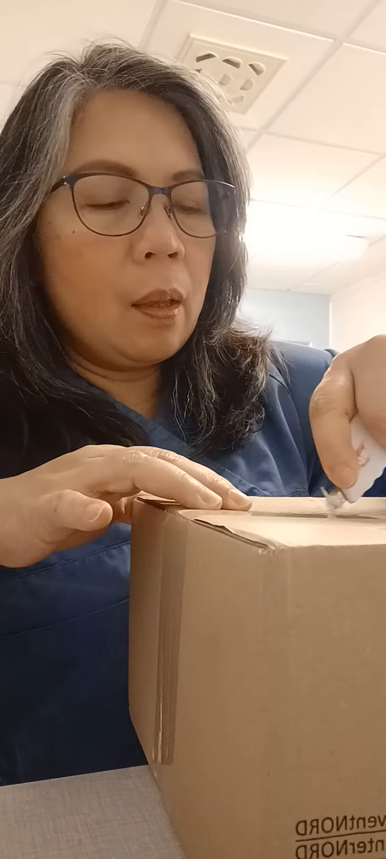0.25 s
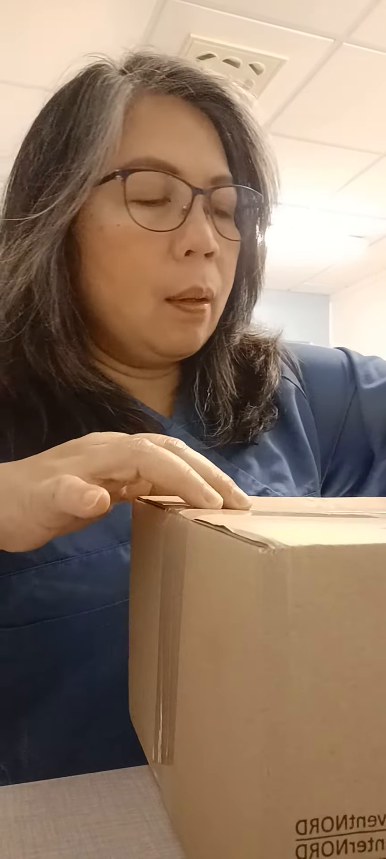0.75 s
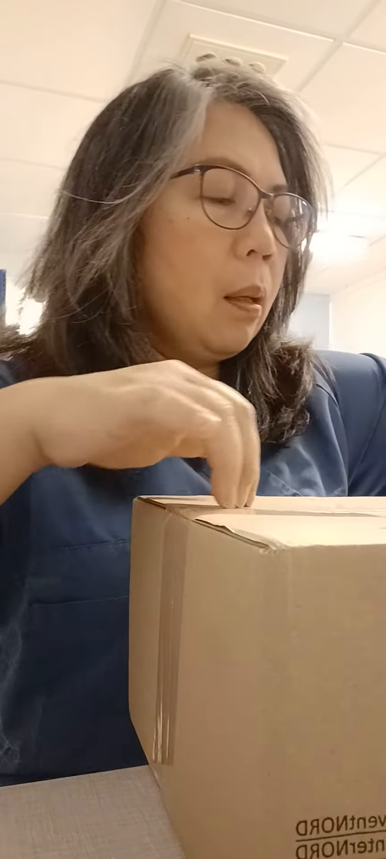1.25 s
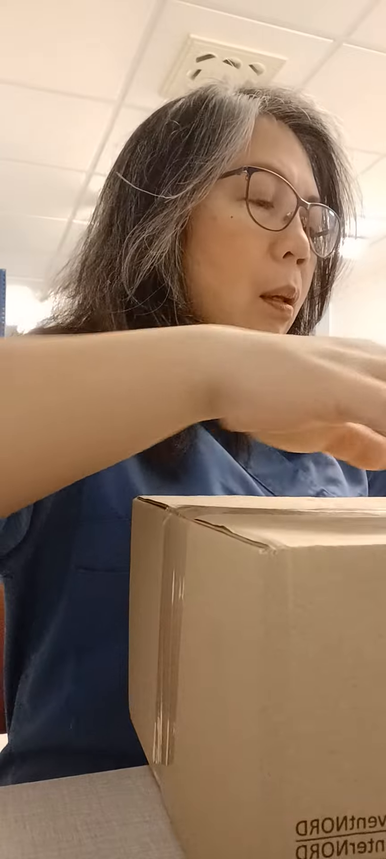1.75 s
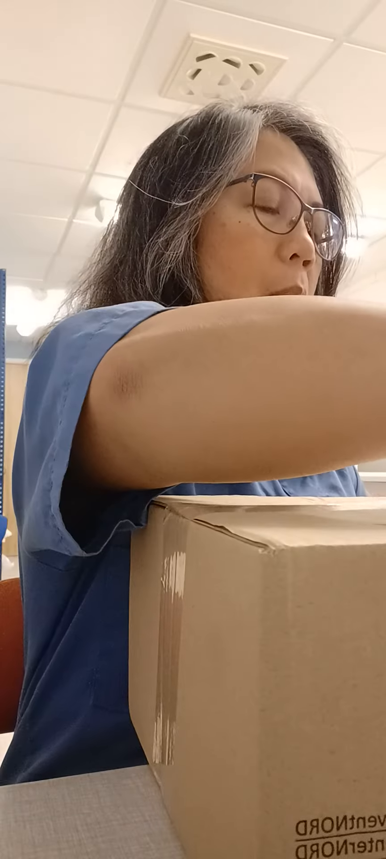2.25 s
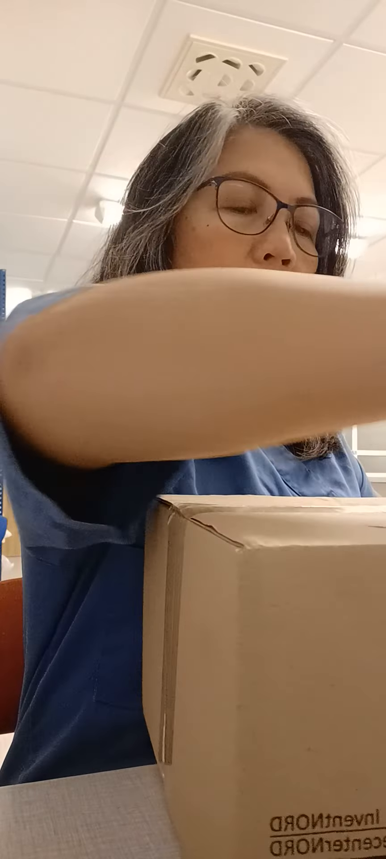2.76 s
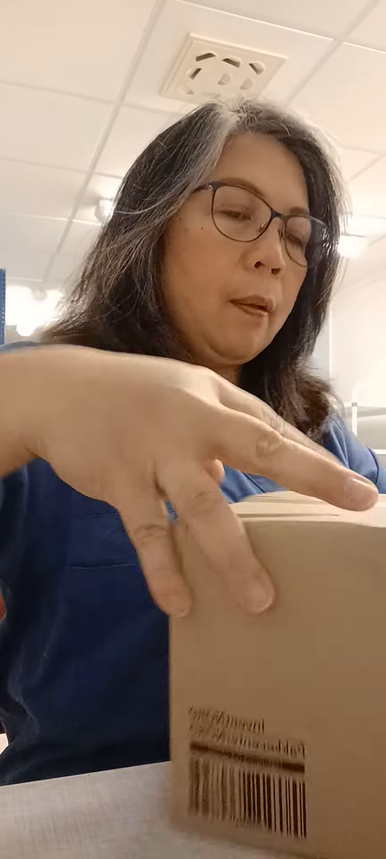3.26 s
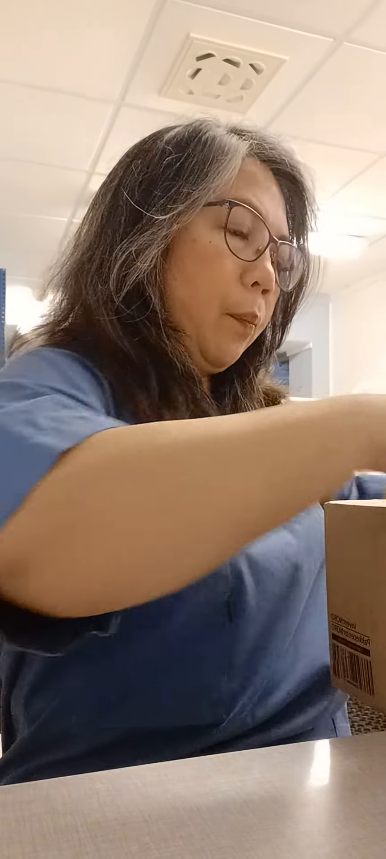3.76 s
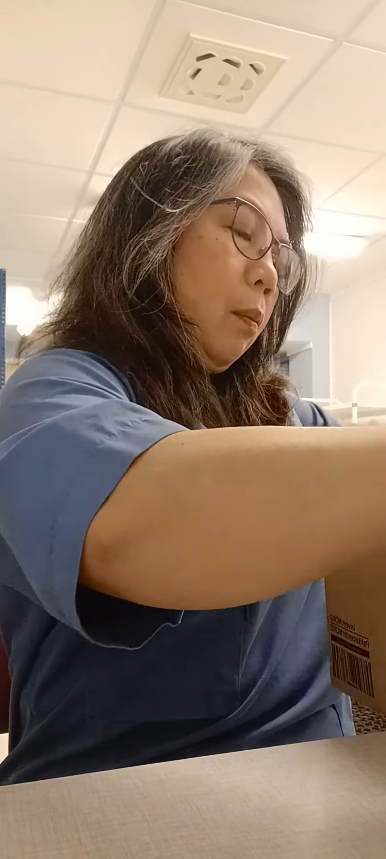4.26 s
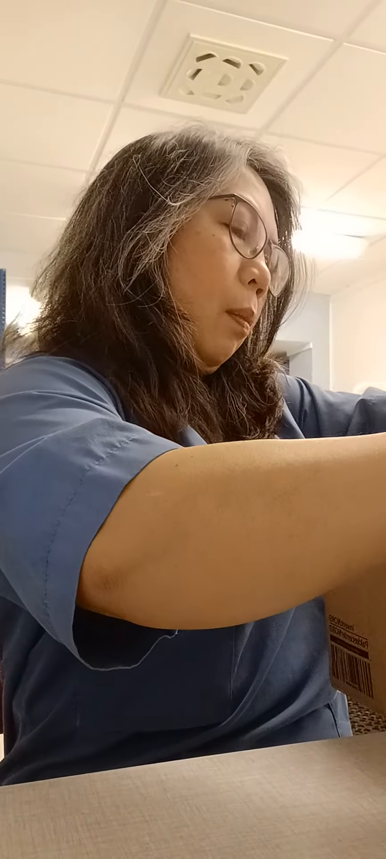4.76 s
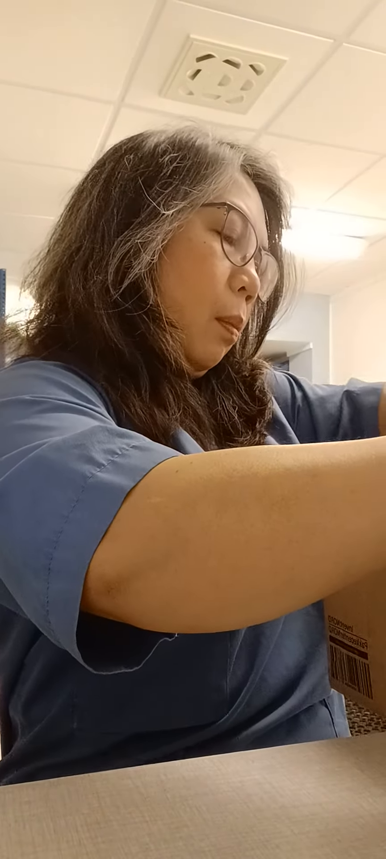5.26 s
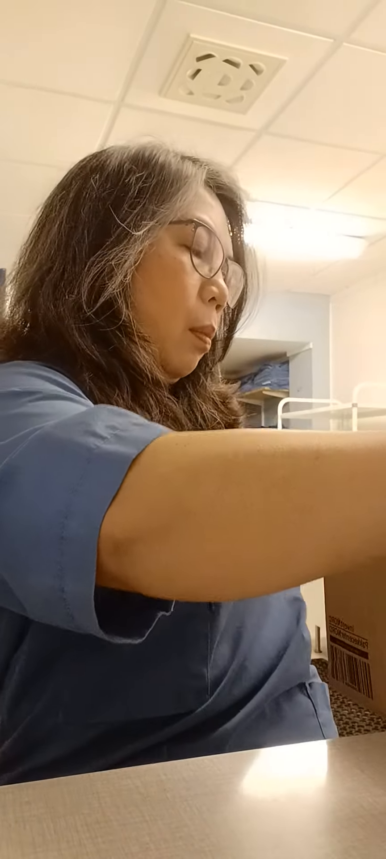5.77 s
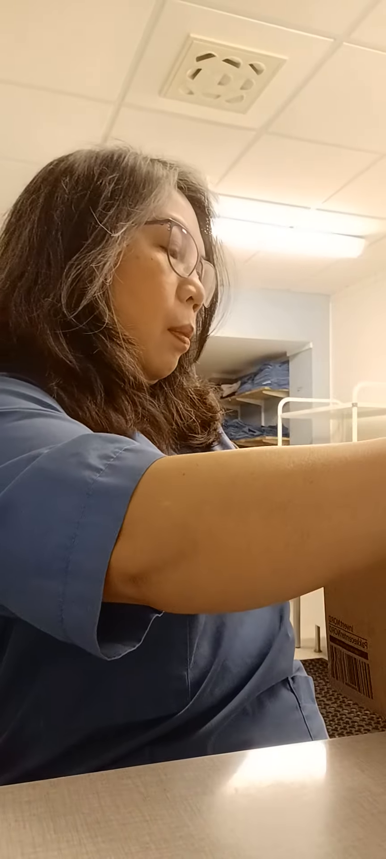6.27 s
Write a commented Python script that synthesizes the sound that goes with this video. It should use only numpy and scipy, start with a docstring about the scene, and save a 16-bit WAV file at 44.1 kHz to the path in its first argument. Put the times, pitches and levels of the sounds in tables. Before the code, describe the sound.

A blade rasps in ragged jabs through packing tape on a cardboard box, with hollow knocks, sharp snaps, a slide and fine metallic jingles.

```python
"""Ventilation hums while a hand brushes a cardboard box, jingling its small metal jewellery. A box cutter
then rasps through packing tape; there are knocks and tape snaps, a slide across the table and a second seam.
Rubbing is made of many tiny random impulses, knocks of ringing tones and noise, snaps of short noise puffs,
jingles of ringing metal tones, and ventilation of low noise with a few hum tones. The room is small and dry."""
import sys
import numpy as np
from scipy import signal
from scipy.fft import rfft, irfft, next_fast_len
from scipy.io import wavfile
from scipy.ndimage import uniform_filter1d, map_coordinates

SR = 44100
rng = np.random.default_rng(int(sys.argv[2]) if len(sys.argv) > 2 else 0)


def to_wav(s):
    """Save 16-bit WAV."""
    ch = np.atleast_2d(s).T  # columns
    pcm = np.round(np.clip(ch, -1, 1) * 32767)  # PCM
    wavfile.write(sys.argv[1], SR, pcm.astype(np.int16))


N = 287532

TIME = np.arange(N) / SR  # seconds from the start of the scene
AGE = np.arange(SR // 3) / SR  # seconds since a short sound began
SIDES = np.array([[1], [-1]])  # left channel, right channel


def amp(db):
    """Turn decibels into a gain."""
    return 10 ** (np.asarray(db) / 20)


def unit(x):
    """Scale a sound to an average (rms) strength of 1."""
    return x / np.sqrt(np.mean(x ** 2) + 1e-20)


def burst(x):
    """Scale a short sound to rms 1 over its first 15 ms."""
    return x / np.sqrt(np.mean(x[..., :662] ** 2) + 1e-20)


def along(points, hz):
    """Read a curve of (Hz, value) points, joined by lines on a log frequency axis."""
    f, v = np.transpose(points)
    return np.interp(np.log(hz + 1), np.log(f + 1), v)


def wobble(rate, count=N):
    """A smooth random curve with rate random values a second."""
    values = rng.standard_normal(2048)
    return map_coordinates(values, [TIME[:count] * rate], mode="wrap")


def filtered(x, response):
    """Multiply the spectrum of x by a response that depends on frequency."""
    n = x.shape[-1]
    padded = next_fast_len(n + 8192)
    spectrum = rfft(x, padded) * response(np.fft.rfftfreq(padded, 1 / SR))
    return irfft(spectrum, padded)[..., :n]


def coloured(x, gain_db, size=4096):
    """Give both channels a tone colour in dB, with a filter that never sounds ahead of its input."""
    cepstrum = irfft(np.log(amp(gain_db(np.fft.rfftfreq(size, 1 / SR))) + 1e-6))
    # folding the cepstrum onto its first half makes the filter causal
    cepstrum[1:size // 2] *= 2
    cepstrum[size // 2 + 1:] = 0
    impulse = irfft(np.exp(rfft(cepstrum)))
    return signal.fftconvolve(x, impulse[None], axes=1)[:, :x.shape[1]]


def add(track, s, sound):
    """Mix a sound into the track at time s, in seconds."""
    part = track[..., max(round(s * SR), 0):][..., :sound.shape[-1]]
    part += sound[..., :part.shape[-1]]


def ring(hz, t60):
    """One ringing tone that falls by 60 dB in t60 seconds."""
    return np.sin(2 * np.pi * hz * AGE) * amp(-60 * AGE / t60)


def puff(t60, rise, colour):
    """A dying burst of coloured noise, different in each channel; t60 and rise are in seconds."""
    envelope = (1 - np.exp(-AGE / rise)) * amp(-60 * AGE / t60)
    noise = rng.standard_normal((2, len(AGE))) * envelope
    return burst(coloured(noise, lambda f: along(colour, f)))


def slips(rate, spread_db, count=N):
    """Stick-slip: about rate tiny impulses a second, uneven in size, each with its own stereo direction."""
    size = amp(spread_db * np.minimum(rng.exponential(size=count), 4))
    way = rng.uniform(0, 2 * np.pi, count)
    happens = rng.random(count) < rate / SR
    return unit(happens * size * np.array([np.cos(way), np.sin(way)]))


def patchy(x, depth_db):
    """The colour shifts as the point of contact moves over the card."""
    z = signal.stft(x, nperseg=256)[2]
    over_pitch = uniform_filter1d(rng.standard_normal(z.shape[1:]), size=3, axis=0)
    field = uniform_filter1d(over_pitch, size=18, axis=1)  # smooth over time too
    return signal.istft(z * amp(depth_db * unit(field)), nperseg=256)[1][:, :x.shape[1]]


def effort(start, end, db, swell_db, attack_s, release_s, arch_db=0):
    """Gain of one hand movement: an attack, a hold that swells or arches, and a fall of 60 dB in release_s."""
    uneven_db, uneven_per_s = 1.2, 16  # the pressure is never quite steady
    from_middle = np.clip((TIME - start) / (end - start), 0, 1) - .5
    arch = -arch_db * (2 * from_middle) ** 2  # loudest halfway
    hold_db = swell_db * from_middle + arch + uneven_db * wobble(uneven_per_s)
    attack = np.clip((TIME - start) / attack_s, 0, 1)
    return attack * amp(db + hold_db - 60 * np.maximum(TIME - end, 0) / release_s)


def ventilation():
    """A low rush of air, alike in both channels in the bass, over a mains hum."""
    # Colour of the rushing air. Each row: frequency in Hz, relative level in dB.
    air_colour = [(18, -55), (30, -39), (70, -8), (86, -11), (106, -5), (124, -10), (199, -6), (336, -20),
                  (404, -19.5), (584, -34), (780, -28.5), (1160, -42.5), (1630, -53), (1960, -48.5),
                  (16000, -58.5)]
    # Tones of the mains hum. Each row: frequency in Hz, level in dB around which it drifts.
    hum_tones = [(49, -62.5), (100, -50), (200, -64.5)]
    air = filtered(rng.standard_normal((2, N)), lambda f: amp(along(air_colour, f)))
    side = filtered(air[1], lambda f: amp(along([(100, -17), (700, -9), (2500, -1)], f)))
    rush = amp(-50.0) * unit(air[0] + SIDES * side)
    hum = sum(amp(db + wobble(3.2)) * np.sqrt(2) * np.sin(2 * np.pi * hz * TIME + 0.22 * wobble(4.4))
              for hz, db in hum_tones)
    left_lift_db = [(80, .1), (700, 0.33), (8000, 0.4)]  # the right is lowered by as much
    return filtered(rush + hum, lambda f: amp(SIDES * along(left_lift_db, f)))


def handling():
    """Skin and cloth brush the card as dense tiny slips, with a few quicker scuffs."""
    # Hands and sleeves brush the box. Each row: start in seconds, end in seconds, relative level in dB,
    # swell over the brush in dB, gain of the sheen above 8 kHz in dB.
    brush_moves = [(0.0, 0.067, -63, -8, -6), (0.21, 0.28, -67.5, 4, 11), (1.59, 1.983, -67, -7, 7),
                   (2.001, 2.483, -52, -2, -0.5), (2.613, 2.766, -45.5, -4.5, -1.5),
                   (2.941, 3.04, -49, -4, 12), (3.839, 4.26, -55, 8.5, 0.5), (4.327, 4.486, -60, -2, -6),
                   (5.48, 5.883, -58, 2, -1), (5.965, 6.032, -63, -15, -2)]
    # Brief scuffs on the card, by fingers or a catching edge. Each row: start in seconds, relative level in dB.
    brief_scuffs = [(0.804, -30.5), (0.8654, -30.5), (2.0236, -42), (2.657, -25.5), (3.576, -34),
                    (4.1144, -41.5), (4.1695, -38.5), (4.591, -40), (4.639, -42), (6.373, -44.5),
                    (6.414, -48)]
    # Colour of the brushing. Each row: frequency in Hz, relative level in dB.
    rustle_colour = [(70, -45), (300, 0.5), (800, 7), (1400, -9.5), (2500, -3), (6200, -6), (8000, -19),
                     (11000, -7), (15000, -3.5)]
    # Colour of the scuffs. Each row: frequency in Hz, relative level in dB.
    scuff_colour = [(100, -43), (500, 5), (900, -11), (2200, 3.5), (4500, -2), (6500, -6.5), (8000, -28),
                    (15000, -21)]
    clumps = amp(1.8 * wobble(60))
    rustle = unit(coloured(slips(rate=2800, spread_db=2.5) * clumps, lambda f: along(rustle_colour, f)))
    sheen = filtered(rustle, lambda f: f > 8000)
    brushes = np.zeros((2, N))
    for start, end, db, swell_db, sheen_db in brush_moves:
        gain = effort(start, end, db, swell_db, attack_s=0.026, release_s=0.34)
        brushes += gain * (rustle + (amp(sheen_db) - 1) * sheen)
    scuff = coloured(slips(rate=6400, spread_db=8.0), lambda f: along(scuff_colour, f))
    pressure = np.zeros(N)
    swell = AGE / 0.0074  # each scuff presses hardest after 7.4 ms
    for s, db in brief_scuffs:
        add(pressure, s, amp(db - 11.5) * swell * np.exp(1 - swell))
    return patchy(brushes + unit(scuff) * pressure, depth_db=4.0)


def jingles():
    """Tiny links strike one another: a flurry of noise sets their high tones ringing, then again more softly."""
    # The moving hand shakes its jewellery. Each row: start in seconds, relative level in dB.
    shakes = [(0.0537, -44.5), (1.6606, -34.5), (1.852, -51), (1.9676, -41), (2.0532, -28.5), (2.3555, -35),
              (3.8652, -36.5), (3.996, -42), (4.0402, -39.5), (4.2228, -29.5), (4.5053, -35.5),
              (5.0754, -36), (5.1573, -33), (5.2434, -37), (5.6426, -43.5), (5.7718, -34.5),
              (6.0018, -47.5)]
    # Ring of the metal links. Each row: central frequency in Hz, central relative level in dB,
    # time to fall by 60 dB in seconds.
    link_tones = [(7200, -1, 0.045), (10000, 0, 0.15), (10140, -4.5, 0.092), (12300, -8, .06),
                  (13100, 4, .07), (13700, 17, 0.058), (15600, -6, 0.033), (15700, -12, .08)]
    fizz_colour = [(1000, -40.0), (2500, -11.5), (6500, -9.5), (8500, -32.0), (10500, -4.5), (14000, 2.5)]
    swing_back_s, swing_back_db = 0.079, -16.5  # about when, and how softly, the links touch once more
    out = np.zeros((2, N))
    swings = [(s + swing_back_s * rng.uniform(.8, 1.2), db + swing_back_db) for s, db in shakes]
    for s, db in list(shakes) + swings:
        contacts = puff(t60=.07, rise=.001, colour=[(1000, 0)])
        metal = np.zeros(len(AGE))
        for f, level, t60 in link_tones:
            # no two strikes ring quite alike
            metal += amp(level + rng.normal(0, 2.5)) * ring(f * (1 + rng.normal(0, .012)), t60)
        tone = burst(signal.fftconvolve(contacts, metal[None], axes=1)[:, :len(AGE)])
        fizz = puff(t60=0.24, rise=0.0011, colour=fizz_colour)
        add(out, s, amp(db - 11.5) * (tone + amp(2) * fizz))
    return out


def rub(strokes, colour, rate, spread_db, flutter_db, rumble_db, tick_db, attack_s, release_s,
        arch_db=0, count=SR):
    """Slips shake the whole box (rumble), its panels (rasp) and its surface (hiss), under one effort."""
    # Broad resonances of the box. Each row: frequency in Hz, width in Hz, lift in dB.
    box_resonances = [(254, 39, 6), (395.3, 28, 7), (805, 37, 1), (1217, 220, 4), (2000, 210, 3)]

    def shape(f):
        """Colour of the rubbing plus the resonances of the box, in dB."""
        lifts = sum(db / (1 + (2 * (f - hz) / w) ** 2) for hz, w, db in box_resonances)
        return along(colour, f) + lifts

    def below(f, hz):
        """A smooth gain that keeps what lies below hz."""
        return 1 / (1 + (f / hz) ** 8)

    out = np.zeros((2, N))
    for start, end, db, swell_db, hiss_db in strokes:
        force = slips(rate, spread_db, count=count)
        body = coloured(force, shape)
        clumps = force * amp(flutter_db * wobble(221, count=count))  # the finest slips come in clumps
        # sparser tiny ticks crackle among the slips
        ticks = amp(tick_db) * slips(rate=150, spread_db=0, count=count)
        crackle = coloured(clumps + ticks, shape)
        rumble = filtered(body[:1], lambda f: below(f, 392))  # long waves reach both channels alike
        rasp = filtered(body[0] + 0.25 * SIDES * body[1], lambda f: below(f, 2120) - below(f, 346))
        hiss = patchy(filtered(crackle, lambda f: 1 - below(f, 1570)), depth_db=2.5)
        mix = amp(rumble_db) * unit(rumble) + unit(rasp) + amp(hiss_db) * unit(hiss)
        gain = effort(start, end, db, swell_db, attack_s, release_s, arch_db)
        add(out, start, gain[round(start * SR):][:count] * mix)
    return out


def seams():
    """The blade catches and slips through tape and card: ragged jabs, one smooth stroke, then the next seam."""
    # Ragged jabs along the first seam. Each row: start in seconds, end in seconds, relative level in dB,
    # swell over the stroke in dB, tape hiss over the rasp in dB.
    first_jabs = [(0.255, 0.385, -48.5, 3.5, -1), (0.42, 0.59, -44, 4, -5.5),
                  (0.645, 0.725, -41.5, -3.5, -5.5), (0.755, 0.965, -41, -1.5, -5)]
    # The long, smooth stroke that opens it, and a deeper bite during it. Each row: start in seconds,
    # end in seconds, relative level in dB, swell over the stroke in dB, tape hiss over the rasp in dB.
    long_cut = [(1.06, 1.545, -40.5, 5, -3.5), (1.21, 1.31, -38.5, 0, -12)]
    # Pulls along the second seam. Each row: start in seconds, end in seconds, relative level in dB,
    # swell over the stroke in dB, tape hiss over the rasp in dB.
    second_pulls = [(4.492, 4.755, -45, -1.5, -12.5), (4.83, 4.93, -53, 15, -16), (4.96, 5.11, -54, 4, -7),
                    (5.135, 5.485, -49, 4, -2)]
    # Colour of the jabs. Each row: frequency in Hz, relative level in dB.
    jab_colour = [(53, -38), (90, -4), (260, -4), (323, -5.5), (393, -2), (581, 1), (769, 4.5), (1240, -2),
                  (1440, -13.5), (4860, -15), (7660, -24), (12600, -20.5), (16000, -23.5)]
    # Colour of the long stroke. Each row: frequency in Hz, relative level in dB.
    cut_colour = [(53, -16), (90, 5), (180, 8), (284, -5), (393, -4), (438, -6.5), (606, 0.5), (753, -9.5),
                  (1210, -7.5), (1410, -21), (4000, -24.5), (4750, -20.5), (8350, -40.5), (12300, -31),
                  (16000, -36.5)]
    # Colour of the second seam. Each row: frequency in Hz, relative level in dB.
    pull_colour = [(53, -34), (90, 5), (176, -2), (229, -1), (316, -10.5), (393, -5.5), (568, -9.5),
                   (821, 0), (1380, -25.5), (1570, -21.5), (3360, -22.5), (3910, -20), (7660, -37.5),
                   (14000, -26), (16000, -38)]
    jabs = rub(first_jabs, jab_colour, rate=2500, spread_db=1.5, flutter_db=2.5, rumble_db=0.5,
               tick_db=-17, attack_s=0.035, release_s=0.38)
    stroke = rub(long_cut, cut_colour, rate=4500, spread_db=0.5, flutter_db=-2.5, rumble_db=1.0,
                 tick_db=-12, attack_s=0.028, release_s=0.1, arch_db=0.5)
    second = rub(second_pulls, pull_colour, rate=4500, spread_db=2.0, flutter_db=2.0, rumble_db=2.5,
                 tick_db=-8, attack_s=0.006, release_s=0.21)
    return jabs + stroke + second


def blow(hz, thump_db, clack_db, crack_db, lag_s):
    """A blow cracks the surface, rings a panel and, lag_s later, sets the wall of the box swinging."""
    # Ring of a cardboard panel. Each row: central frequency in Hz, central relative level in dB,
    # time to fall by 60 dB in seconds.
    panel_tones = [(364, -12, 0.09), (515, -10.5, 0.076), (613, -23, 0.022), (769, 7, 0.026),
                   (880, -4, 0.023), (1108, -10, 0.032), (1620, -12, 0.012), (2275, -26.5, 0.047)]
    # Colour of the surface crack. Each row: frequency in Hz, relative level in dB.
    crack_colour = [(100, -46), (500, 12.5), (1100, 15), (1700, 7.5), (2400, 7.5), (3500, -0.5), (6300, -4),
                    (8000, -16), (15000, -14)]
    t60 = 10.6 / hz  # the wall falls by 60 dB in 10.6 swings
    wall = ring(hz, t60) + amp(-11.5) * ring(hz * 1.35, t60)
    thump = wall * (1 - np.exp(-AGE / 0.0026))
    strength, detune = rng.normal(0, [[1.5], [.015]], (2, len(panel_tones)))  # no two blows ring alike
    panel = np.zeros(len(AGE))
    for k, (f, level, life) in enumerate(panel_tones):
        panel += (-1) ** k * amp(level + strength[k]) * ring(f * (1 + detune[k]), life)
    crush = 1 - np.exp(-(AGE / .0013) ** 2)  # the contact softens the onset
    crack = puff(t60=0.051, rise=0.0022, colour=crack_colour)
    out = amp(clack_db) * burst(crush * panel) + amp(crack_db) * crack
    add(out, lag_s, amp(thump_db) * burst(thump))
    return out


def knocks():
    """Soft blows only thump, hard ones clack and crack; the corners of the box land with a hollow clack."""
    # Blows on the box, from a soft palm (0) to the blade breaking through (1). Each row: start in seconds,
    # relative level in dB, hardness from 0 to 1, pitch of the struck wall in Hz.
    box_blows = [(0.302, -29, 0.5, 140), (0.538, -23.5, 0.74, 158), (0.573, -27.5, 0.54, 143),
                 (0.654, -26, 0.93, 354), (0.78, -37, 1, 404), (0.91, -34.5, 1, 285),
                 (0.966, -28.5, 0.23, 203), (1.04, -27, 0.62, 187), (1.093, -27.5, 0.44, 130),
                 (1.522, -31, 0.86, 122), (2.221, -35, 0.76, 196), (2.263, -22, 0.16, 214),
                 (2.649, -30, 0.53, 153), (2.663, -22, .7, 126), (2.671, -31, 0.51, 377),
                 (3.871, -37.5, 0, 124), (4.494, -30, 0.5, 147), (4.765, -43.5, 0.9, 630),
                 (5.156, -37.5, 0.93, 217), (5.432, -34, 0.82, 157), (5.465, -25.5, 0.8, 150),
                 (5.676, -35, 0.37, 130)]
    # The box is set down, corner after corner. Each row: start in seconds, relative level in dB.
    corner_landings = [(4.211, -30.5), (4.228, -21.5), (4.253, -27), (4.28, -41)]
    soft_db = 38  # the softest blow clacks and cracks this much less than the hardest
    hard_thump_db, wall_lag_s = -1.5, 0.00833  # thump level and delay of the hardest blow
    out = np.zeros((2, N))
    for s, db, hardness, hz in box_blows:
        clack_db = -soft_db * (1 - hardness)
        thump_db = hard_thump_db * hardness ** 2
        hit = blow(hz, thump_db, clack_db, crack_db=clack_db, lag_s=wall_lag_s * hardness ** 2)
        add(out, s, amp(db - 2.0) * hit)
    for s, db in corner_landings:
        add(out, s, amp(db) * blow(hz=233, thump_db=-4.5, clack_db=-2.5, crack_db=-21, lag_s=0.002))
    return out


def snaps():
    """Taut tape gives way with a short, bright tick of noise."""
    # Sharp snaps of the tape. Each row: start in seconds, relative level in dB.
    tape_snaps = [(0.5741, -31), (1.5239, -19), (2.1284, -33.5), (2.2218, -25.5), (2.4428, -40.5),
                  (2.6638, -21.5), (2.7906, -30), (3.2705, -25), (4.3435, -38), (4.6059, -36),
                  (4.7666, -26), (4.9876, -32), (5.1567, -27.5), (5.216, -29.5), (5.2544, -30.5),
                  (5.8576, -38)]
    # Colour of a snap. Each row: frequency in Hz, relative level in dB.
    snap_colour = [(100, -82), (600, 11.5), (2000, 1), (4000, 4), (6400, 2.5), (8000, -10), (12000, -1),
                   (16000, -4.5)]
    out = np.zeros((2, N))
    for s, db in tape_snaps:
        add(out, s, amp(db - 14.5) * puff(t60=0.017, rise=0.00048, colour=snap_colour))
    return out


def slide():
    """Card on a smooth table: dense, fine slips, and one hollow scrape where an edge catches."""
    # The box is pushed across the table. Each row: start in seconds, end in seconds, relative level in dB,
    # swell over the push in dB, hiss over the rasp in dB.
    pushes = [(2.94, 3.62, -45.5, 3.5, 7)]
    # Colour of the sliding. Each row: frequency in Hz, relative level in dB.
    push_colour = [(53, -51), (90, 13.5), (169, -1), (229, -3), (323, -12.5), (360, -19), (556, -19.5),
                   (839, -14.5), (1410, -24.5), (2130, -18), (2530, -10.5), (6030, -12), (7820, -23),
                   (13500, -12.5), (16000, -19)]
    # the push is fastest, and loudest, halfway: hence the arch
    out = rub(pushes, push_colour, rate=14000, spread_db=2.5, flutter_db=0.8, rumble_db=0, tick_db=-18.5,
              attack_s=0.1, release_s=0.4, arch_db=3)
    hollow = [(100, -53), (600, -12), (900, 5.5), (1300, -9.5), (2200, 2.5), (3000, -14), (8000, -26)]
    add(out, 3.39, amp(-33) * puff(t60=0.066, rise=0.017, colour=hollow))
    return out


def walls():
    """A stereo room tail of noise in which each frequency dies at its own speed."""
    # How long the room rings. Each row: frequency in Hz, time to fall by 60 dB in seconds.
    room_decay = [(150, 0.46), (800, 0.25), (4000, 0.24), (14000, 0.13)]
    # How strongly the room answers. Each row: frequency in Hz, room level in dB.
    room_level = [(100, -22), (400, -5.5), (900, -16), (2200, -8.5), (14000, -4.5)]
    hz, t, z = signal.stft(rng.standard_normal((2, SR // 2)), SR, nperseg=256)
    decay = amp(-60 * t / along(room_decay, hz)[:, None])
    energy = 128 * np.sum(decay ** 2, axis=1, keepdims=True)
    decay *= amp(along(room_level, hz))[:, None] / np.sqrt(energy)
    return signal.istft(z * decay, SR, nperseg=256)[1]


def office(x):
    """Direct sound, earlier in the left channel, plus the room's answer; the right channel is louder."""
    # Stereo balance. Each row: frequency in Hz, left minus right in dB.
    balance = [(60, -2.5), (200, -2), (400, -4), (720, -9.5), (1300, -6), (2400, -8), (4400, -7),
               (8000, -3), (15000, -6)]
    later = np.pad(x, ((0, 0), (90, 0)))  # the room answers 90 samples (2 ms) late
    wet = signal.fftconvolve(later, walls(), axes=1)[:, :N]
    # the left channel leads the right by 5.4 samples
    direct = filtered(x, lambda f: np.exp(1j * np.pi * f * SIDES * 5.4 / SR))
    return filtered(direct + wet, lambda f: amp(SIDES * along(balance, f) / 2))


def scene():
    """Work on the box, heard in the office, over the ventilation."""
    work = seams() + slide() + handling() + knocks() + snaps() + jingles()
    return office(work) + ventilation()


def record(dry):
    """The recorder cuts the deep bass and keeps nothing above its band limit."""
    top_hz, bass_hz = 15900, 39

    def response(f):
        """Gain of the recorder at each frequency."""
        treble = np.clip((top_hz - f) / 200 + .5, 0, 1)
        bass = 1 - 1 / (1 + (f / bass_hz) ** 8)
        return treble * bass

    return filtered(dry, response)


dry = scene()
out = record(dry)
to_wav(out)
```